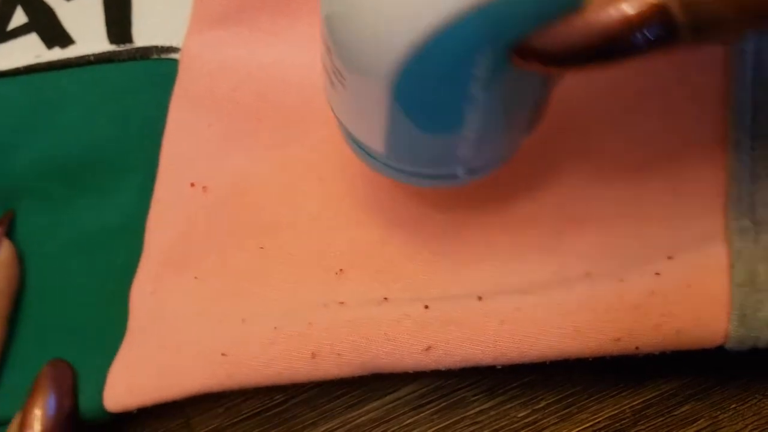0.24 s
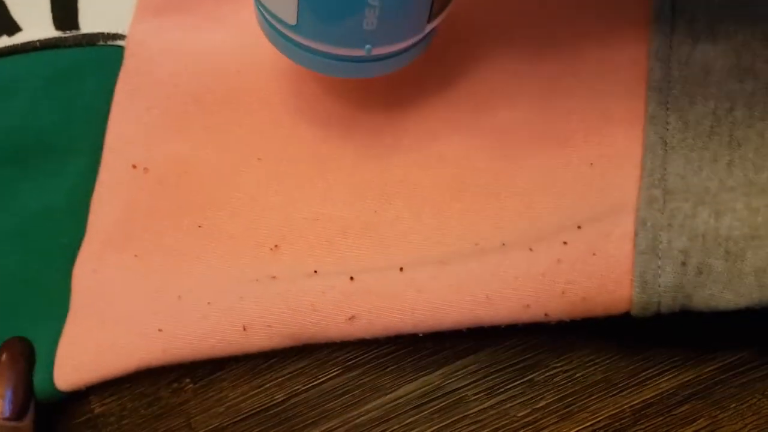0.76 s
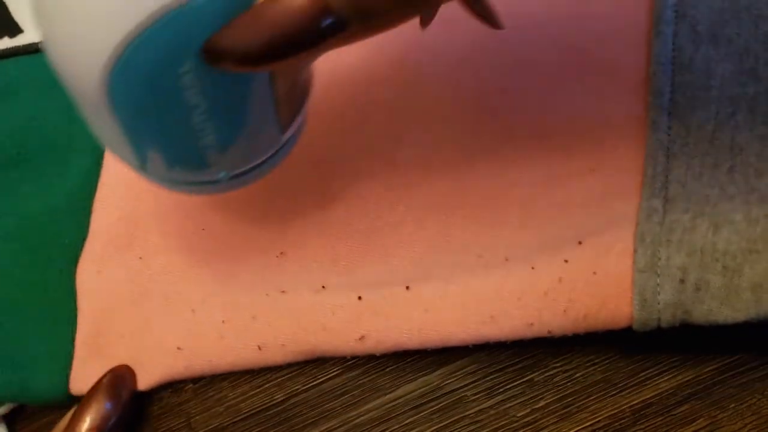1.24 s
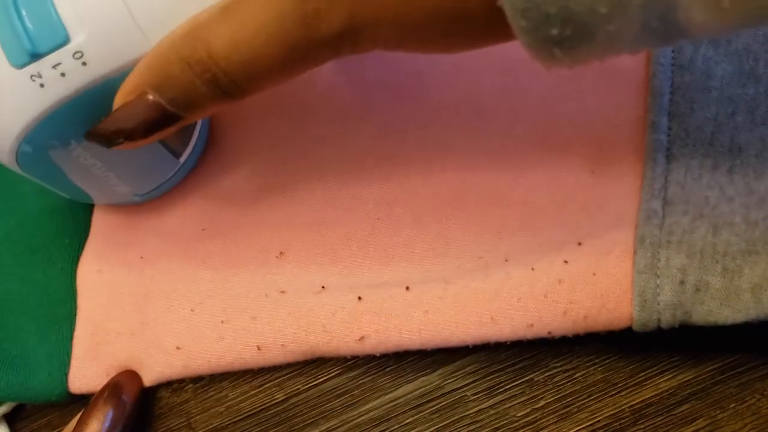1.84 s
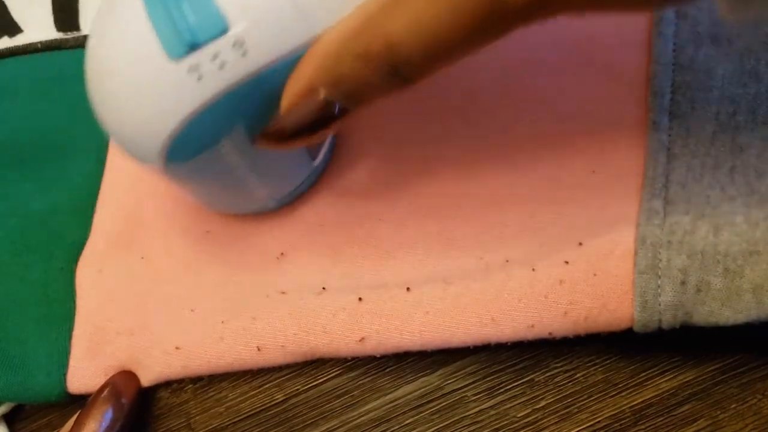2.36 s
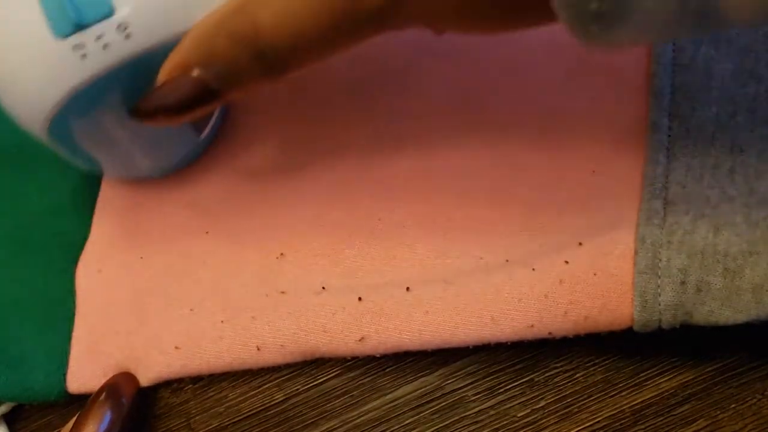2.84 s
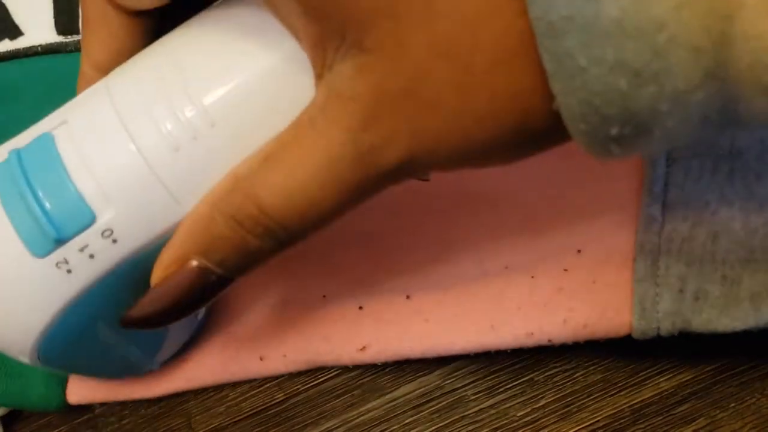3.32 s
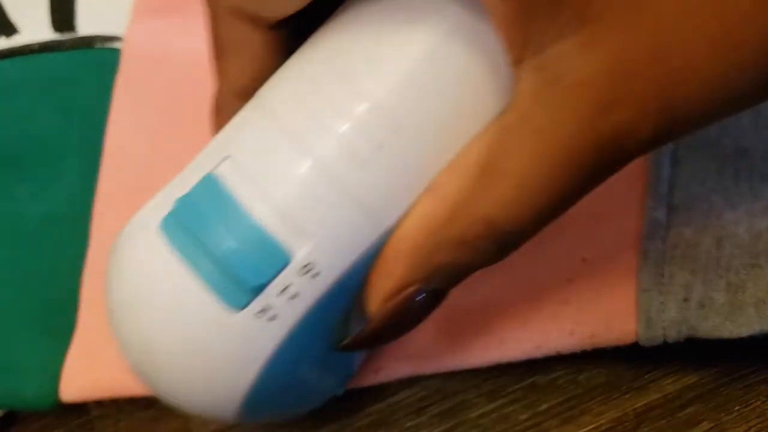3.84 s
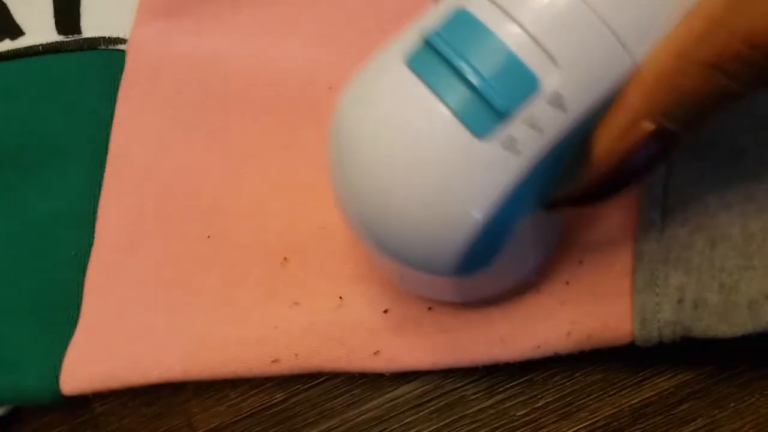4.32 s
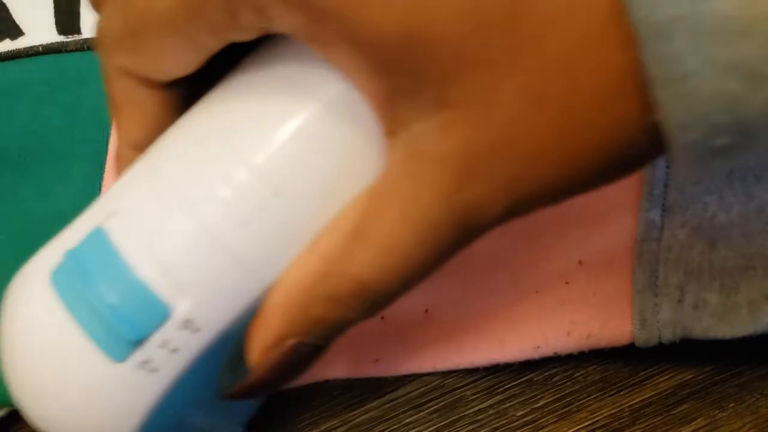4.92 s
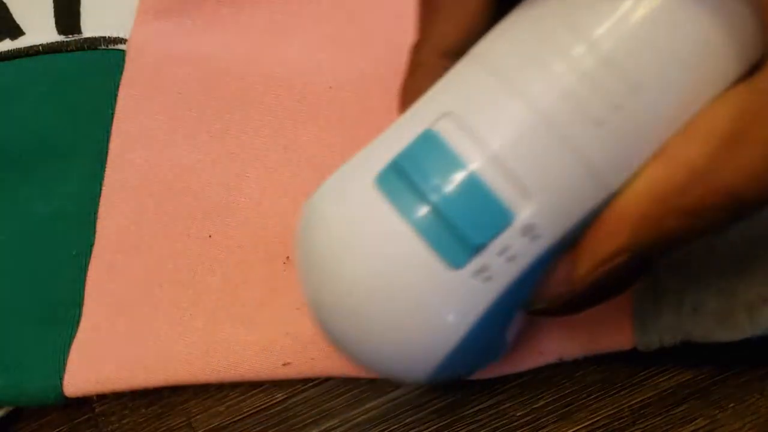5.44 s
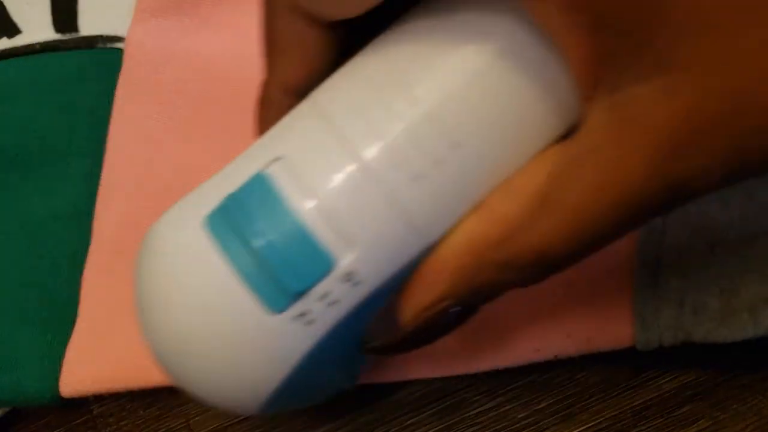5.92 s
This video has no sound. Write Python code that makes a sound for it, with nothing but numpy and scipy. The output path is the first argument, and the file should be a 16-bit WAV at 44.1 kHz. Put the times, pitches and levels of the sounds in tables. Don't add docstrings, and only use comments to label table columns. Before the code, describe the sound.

Close, buzzy whir of a small motorised lint shaver, its hiss and pitch wavering slightly as it bites fluff on fabric indoors.

```python
import sys
import numpy as np
from scipy import signal
from scipy.fft import rfft, irfft, next_fast_len
from scipy.io import wavfile
from scipy.ndimage import uniform_filter1d, map_coordinates

SR = 44100
rng = np.random.default_rng(int(sys.argv[2]) if len(sys.argv) > 2 else 0)


def put_to_file(sound):
    columns = np.atleast_2d(sound).T
    safe = np.clip(columns, -1, 1)
    whole_steps = np.round(safe * 32767)
    wavfile.write(sys.argv[1], SR, whole_steps.astype(np.int16))


def voltage_ratio(level):
    return 10 ** (np.asarray(level, float) / 20)


N = 272614


def unit(x):
    return x / np.sqrt(np.mean(x ** 2) + 1e-20)


def curves(rows):
    s, *cols = np.transpose(rows)
    return [np.interp(np.arange(N) / SR, s, c) for c in cols]


def smooth(coarse):
    return np.interp(np.arange(N) / 64, np.arange(len(coarse)), coarse)


def wobble(rate, count=1):
    at = np.arange(0, N + 64, 64) * rate / SR
    knots = rng.standard_normal((count, int(at[-1]) + 4))
    return np.array([smooth(map_coordinates(k, [at])) for k in knots])


def held(rows, rest_db):
    t = np.arange(0, N + 64, 64) / SR
    edge_s = 0.061
    level_db = rest_db
    for start, end, db in rows:
        inside = np.clip(np.minimum(t - start, end - t) / edge_s + 0.5, 0, 1)
        level_db = level_db + (db - rest_db) * inside
    return smooth(level_db)


def coloured(x, spectrum):
    f, db = np.transpose(spectrum)
    hz = np.fft.rfftfreq(2048, 1 / SR)
    cepstrum = irfft(np.log(voltage_ratio(np.interp(np.log(hz + 1), np.log(f), db)) + 1e-4))
    cepstrum = cepstrum * np.r_[1, np.full(1023, 2), 1, np.zeros(1023)]
    impulse = irfft(np.exp(rfft(cepstrum)))
    return unit(signal.fftconvolve(x, impulse[None], axes=1)[:, :N])


def pair(alike):
    a, b = rng.standard_normal((2, N))
    turn = np.arccos(np.clip(alike, -1, 1)) / 2
    return np.cos(turn) * a + np.sin(turn) * np.array([b, -b])


def impulses(at, size):
    taps = np.arange(-7, 9)
    d = taps - (at % 1)[:, None]
    kernel = np.sinc(d) * np.cos(np.pi * d / 16) ** 2
    index = np.clip(at.astype(int)[:, None] + taps, 0, N - 1).ravel()
    return np.array([np.bincount(index, (s[:, None] * kernel).ravel(), N) for s in size])


# t/s, level/dB
BEFORE = [(0.0, -60.5), (0.28, -61)]
# f/Hz, level/dB per Hz
RUSTLE = [(24, -41), (40, -24), (541, -10), (693, -16), (824, -20), (1000, -23), (1350, -22), (1460, -23),
          (3140, -38.5), (3740, -43), (4400, -43), (5200, -48), (9000, -52.5), (14000, -55), (15000, -73)]
# t/s, peak level/dB, relative tick level/dB
KNOCKS = [
    (0.153, -33, -7.5),
    (0.156, -50, -0.5),
    (0.166, -35, -24),
    (0.1962, -46.5, -4),
    (0.257, -42, -10),
    (0.267, -35.5, -30),
]
# f/Hz, level/dB, 60 dB decay time/s
KNOCK_MODES = [(207, 0.5, 0.063), (235, -6.5, 0.092), (418, -9.5, 0.053)]
# f/Hz, level/dB
TICK_MODES = [(1850, 7.5), (2100, 4), (2600, -3), (3500, -0.5), (4300, -12), (6200, -22), (8600, -22)]


def handling():
    out, t = np.zeros(N), np.arange(SR // 8) / SR
    for s, db, tick_db in KNOCKS:
        thud = sum(voltage_ratio(level - 60 * t / t60) * np.sin(2 * np.pi * hz * t) for hz, level, t60 in KNOCK_MODES)
        tick = sum(voltage_ratio(level + rng.normal(0, 2.4)) * np.sin(2 * np.pi * hz * t) for hz, level in TICK_MODES)
        scrape = uniform_filter1d(uniform_filter1d(rng.standard_normal(len(t)), size=5), size=4)
        tick = voltage_ratio(tick_db - 0.5 - 60 * t / 0.013) * (tick + scrape) * (1 - np.exp(-t / 0.001))
        out[round(s * SR):][:len(t)] += voltage_ratio(db - 1.0) * (thud * (1 - np.exp(-t / 0.0035)) + tick)
    rustle_db = curves(BEFORE)[0] + 2.5 + 1.4 * wobble(34.0)
    return out + voltage_ratio(rustle_db) * coloured(pair(1), RUSTLE)


# t/s, half length/s, level/dB
SHOVES = [(1.403, 0.081, -65), (1.71, 0.11, -63), (2.1, 0.23, -69), (3.033, 0.14, -69),
          (3.462, 0.16, -66.5), (3.678, 0.11, -59), (3.874, 0.092, -59.5), (4.063, 0.043, -65),
          (4.425, 0.28, -64), (4.823, 0.074, -69), (5.1, 0.27, -66), (5.36, 0.097, -55),
          (5.68, 0.23, -63.5), (6.023, 0.15, -64)]
# f/Hz, level/dB per Hz
BOARD = [(100, -25), (150, 2), (175, -9.5), (205, 0), (250, -10), (320, -8), (450, -32), (800, -40),
         (2000, -120)]
# f/Hz, level/dB per Hz
TABLE = [(15, -71), (25, -32), (59, 3.5), (91, 2.5), (130, -5), (170, -38), (290, -120)]
# f/Hz, level/dB per Hz
WASH = [(200, -17), (300, -5), (600, 0.5), (1000, -3), (1400, -4.5), (2000, -19), (3000, -59), (4000, -120)]
# f/Hz, level/dB
TABLE_HUM = [(59, -85), (75, -75), (116, -78.5), (151, -76.5)]
# t/s, level/dB
WHINE = [(.3, -62.5), (1.5, -62.5), (1.78, -55.5), (2.07, -61), (2.4, -58.5), (2.82, -57.5), (3.45, -59),
         (3.53, -54), (3.95, -58), (4.2, -55), (4.33, -56), (4.48, -53.5), (4.8, -55), (4.95, -53),
         (5.4, -55.5), (5.87, -53), (5.98, -55.5), (6.18, -51.5)]


def drag():
    t = np.arange(N) / SR
    idle_db, rumble_db, floor_db = -71.5, -71.5, -65.5
    push = voltage_ratio(idle_db) + sum(voltage_ratio(db) * np.exp(-((t - s) / w) ** 2) for s, w, db in SHOVES)
    relative_push = push / push.mean()
    board = unit(voltage_ratio(2.3 * wobble(22.02)) * coloured(pair(0.92), BOARD))
    rumble = voltage_ratio(rumble_db + 2.9 * wobble(9.8)) * relative_push ** 0.3 * coloured(pair(0.91), TABLE)
    wash = voltage_ratio(floor_db + 0.93 * (curves(WHINE)[0] + 59)) * coloured(pair(0.64), WASH)
    hum = sum(voltage_ratio(db + 2.4 * wobble(3.9)[0]) * np.sin(2 * np.pi * hz * t) for hz, db in TABLE_HUM)
    return relative_push ** 0.48 * hum + wash + push * board + rumble


# multiple of the shaft rate, level/dB
ORDER_DB = [(1, -13), (2, -15), (3, -10.5), (4, -31.5), (5, -13), (6, 0), (7, -20), (8, -15), (9, -13),
            (10, -25), (11, -9), (12, -14.5), (13, -18)]
# start t/s, end t/s, level/dB
FREE_RUNS = [(.3, 1.17, -56), (1.17, 1.33, -59.5), (2.36, 2.68, -57), (2.95, 3.12, -67), (3.36, 3.9, -58),
             (3.9, 4.14, -55.5), (4.14, 4.55, -47.5), (4.55, 4.93, -55.5), (4.93, 5.13, -65),
             (5.13, 5.5, -52.5), (5.5, 5.72, -49.5), (5.72, 6.3, -55)]
# start t/s, end t/s, level/dB
SEATED = [
    (1.6, 2.1, -67.5),
    (2.35, 2.45, -67),
    (2.65, 3.1, -68),
    (3.42, 4.0, -66),
    (4.72, 5.35, -60),
    (5.6, 5.8, -64.5),
    (5.92, 6.08, -61.5),
]
# start t/s, end t/s, level/dB
TWENTYFOURS = [
    (2.5, 2.72, -67),
    (3.12, 3.33, -62),
    (3.9, 4.32, -64),
    (4.55, 4.75, -56.5),
    (5.12, 5.9, -57),
]
# start t/s, end t/s, level/dB
THIRTIES = [
    (.3, .74, -60),
    (.74, 1.33, -57.5),
    (1.33, 2.0, -65),
    (2.74, 2.95, -57.5),
    (2.95, 3.12, -65),
    (3.92, 4.55, -56),
    (4.62, 4.9, -62),
    (5.12, 5.6, -51),
    (5.6, 6.3, -58),
]


def motor(turns):
    def tone(k, lag):
        phase = k * turns + rng.random()
        return np.sqrt(2) * np.sin(2 * np.pi * phase + np.array([[lag], [-lag]]))

    quiet_db, damped_db, loose_db = -76, -67.5, -75.5
    six_db = curves(WHINE)[0] + 1.17 * wobble(5.1)
    eighteen_db = held(FREE_RUNS, damped_db) + 1.0 * wobble(4.67)
    twentyfour_db = held(TWENTYFOURS, quiet_db) + 1.1 * wobble(7.6)
    thirty_db = held(THIRTIES, quiet_db) + 0.97 * wobble(6)
    three_db = held(SEATED, loose_db) + 2.5 * wobble(6)
    hum = sum(voltage_ratio(db + 1.9 * wobble(3.61)) * tone(k, rng.normal(0, 0.56))
              for k, db in ORDER_DB if k not in (1, 2, 3, 6))
    high = voltage_ratio(eighteen_db) * tone(18, 0.64) + voltage_ratio(thirty_db) * tone(30, 0.8)
    high = high + voltage_ratio(twentyfour_db) * tone(24, 0.92)
    return voltage_ratio(six_db) * (tone(6, 0.21) + voltage_ratio(-0.8) * hum) + high + voltage_ratio(three_db) * tone(3, 0.71)


def ticks(turns, contact, slip_s, scatter, drift, drift_rate, apart, sixfold, count):
    def even(x):
        return 1.37 * np.tanh(x / 1.37)

    poles = 6
    angle = (np.arange(count) + np.tile(rng.random(count // poles), poles)) / count
    at = np.interp(np.arange(int(turns[-1]))[:, None] + angle, turns, np.arange(N))
    knots = rng.standard_normal((count, 64))
    slow = map_coordinates(knots, [np.arange(count) + 0 * at, at * drift_rate / SR], order=1)
    repeated = np.tile(rng.standard_normal(count // poles), poles)
    own = even(rng.standard_normal(count) + sixfold * repeated)
    view = apart * even(rng.standard_normal((2, 1, count)))
    chance = rng.standard_normal((4,) + at.shape)
    press = contact[at.astype(int)]
    random_size = (0.046 + scatter * press) * (chance[0] + apart * chance[1:3])
    size = own + view + drift * slow + random_size
    return impulses((at + SR * slip_s * press * chance[3]).ravel(), size.reshape(2, -1))


# t/s, level over the whir/dB
SNAGS = [(1.937, 1), (1.983, 1), (2.053, 8), (2.159, 0), (2.316, 4.5), (2.345, 2), (2.445, 1), (2.799, 3),
         (3.153, 6), (3.398, -3), (3.414, 6), (3.44, 2), (3.554, 1), (3.68, 3.5), (3.71, 5), (3.83, 4),
         (3.865, 3), (3.946, 4.5), (3.982, 2.5), (4.059, -2), (4.278, 6), (4.783, 2.5), (4.872, 4),
         (5.105, 7.5), (5.156, 2), (5.204, 5), (5.86, 0), (6.043, 3.5), (6.113, 2.5)]


def snags(contact):
    decay_s, rise_s = 0.0037, 0.00041
    pills_per_s, pill_db = 60, -12
    bites, t = np.zeros(N), np.arange(SR // 20) / SR
    chance = rng.random((600, 3))
    at = (chance[:, 0] * N).astype(int)
    caught = chance[:, 1] < contact[at] * pills_per_s * N / SR / len(at)
    bites[at] = caught * voltage_ratio(pill_db) * 2 * chance[:, 2]
    for s, db in SNAGS:
        bites[round(s * SR)] = voltage_ratio(db) - 1
    shape = np.exp(-t / decay_s) * (1 - np.exp(-t / rise_s))
    return 1 + signal.fftconvolve(bites, shape / shape.max())[:N]


# delay t/s, level/dB
ECHOES = [(.00022, -12.5), (.0006, -11)]
# t/s, f/Hz, boost level/dB
SHEEN = [(0.3, 12300, 6), (0.63, 13000, 6), (0.76, 12200, 2), (1.12, 12100, 3), (1.23, 13300, 1),
         (1.3, 11400, 1), (1.43, 12400, 4.5), (2.02, 11800, 4), (2.1, 12600, 8), (3.3, 12200, 3.5),
         (3.36, 11300, 6), (4.0, 11100, 4.5), (4.05, 12200, 0), (4.31, 11500, -1), (4.43, 12900, -2),
         (4.49, 11600, 4), (6.03, 11200, 1), (6.18, 12100, 1)]
# start t/s, end t/s, level/dB, f/Hz, half width f/Hz
HOLLOWS = [(.42, .52, -30, 4350, 300), (.62, .74, -25, 4150, 350), (.92, 1.04, -40, 4500, 250),
           (1.1, 1.26, -40, 4450, 300), (1.3, 1.39, -40, 3900, 350), (2.09, 2.21, -60, 3600, 350),
           (2.24, 2.32, -60, 3950, 300), (2.38, 2.43, -70, 3650, 500), (2.81, 2.88, -35, 2350, 250),
           (3.16, 3.34, -30, 3550, 180), (3.49, 3.73, -80, 3900, 530), (1.12, 1.26, -40, 2700, 130),
           (1.5, 1.68, -30, 4000, 150), (1.56, 1.66, -35, 3250, 120), (.5, .7, -30, 3950, 120),
           (4.845, 4.87, -40, 4000, 250), (4.845, 4.87, -40, 2750, 130), (4.93, 4.96, -40, 4050, 200),
           (5.005, 5.03, -40, 4500, 200), (5.145, 5.17, -40, 3100, 200), (4.98, 5.01, -40, 7250, 250),
           (5.24, 5.32, -25, 4500, 150), (2.08, 2.33, -30, 2250, 110), (4.5, 4.7, -20, 1500, 120),
           (1.45, 1.52, -30, 8600, 350), (5.6, 5.65, -35, 11700, 300), (3.7, 3.74, -40, 14400, 350),
           (3.68, 3.71, -60, 4600, 350), (3.79, 3.87, -30, 3800, 250), (4.475, 4.52, -50, 2950, 230),
           (4.6, 4.65, -50, 3500, 300), (4.97, 5.05, -35, 3650, 220), (5.07, 5.12, -40, 3950, 200),
           (5.15, 5.19, -40, 4550, 200), (6.0, 6.04, -50, 3100, 300), (.49, .57, -45, 9300, 280),
           (4.66, 4.71, -45, 10100, 280), (5.03, 5.12, -50, 14700, 400)]
BAND_HZ = [800, 2850, 3700, 4900, 7300, 15800]


def moving(x, levels_db, unrest, sway, patchy_db, twist):
    hz, t, z = signal.stft(x, SR, nperseg=512)
    frame = np.minimum((t * SR).astype(int), N - 1)
    for delay, db in ECHOES:
        path = delay * np.exp(sway * wobble(1.6, count=2)[:, None, frame])
        z = z * (1 + voltage_ratio(db) * np.exp(-2j * np.pi * hz[:, None] * path))
    left_leads_s = 0.0001594
    z = z * np.exp(1j * np.pi * hz[:, None] * left_leads_s * np.array([1, -1])[:, None, None])
    field = uniform_filter1d(rng.standard_normal((2,) + z.shape), size=3, axis=2)
    field = uniform_filter1d(field, size=24, axis=3)
    z = z * voltage_ratio(patchy_db * unrest[frame] * unit(field[0]))
    z = z * np.exp(1j * twist * unrest[frame] * unit(field[1]))
    centre_hz, boost_db = np.array(curves(SHEEN))[:, frame]
    z = z * voltage_ratio(boost_db * np.exp(-((hz[:, None] - centre_hz) / 600) ** 2))
    gain = np.zeros(z.shape[1:])
    for lo, hi, db in zip(BAND_HZ, BAND_HZ[1:], levels_db):
        band = (hz >= lo) & (hz < hi)
        power = uniform_filter1d(np.sum(np.abs(z.mean(0)[band]) ** 2, 0), 21)
        gain[band] = voltage_ratio(db[frame]) / np.sqrt(np.abs(power) + 1e-12)
    shut_db, shut_s = 0, 0.022
    for start, end, db, centre, width in HOLLOWS:
        inside = np.clip(np.minimum(t - start, end - t) / shut_s + 0.5, 0, 1)
        shut_db = shut_db + np.exp(-((hz[:, None] - centre) / width) ** 4) * db * inside
    z = z * uniform_filter1d(gain, size=5, axis=0) * voltage_ratio(shut_db)
    return signal.istft(z, SR, nperseg=512)[1][:, :N]


# f/Hz, level/dB per Hz
FOIL = [(2470, -40), (3500, -19), (4200, -15.5), (4880, -14), (5250, -9), (5510, 1), (5920, -2),
        (6880, 0.5), (7430, -3.5), (7900, -0.5), (9030, -5.5), (9540, -3), (10900, 1.5), (11700, -3),
        (12500, 0), (15100, -1), (15800, -1.5)]
# f/Hz, level/dB per Hz
HOUSING = [(470, -40), (800, -12), (1100, -13.5), (1240, -13), (1590, -10), (2030, 0.5), (2200, -1.5),
           (2470, 3.5), (3210, -5), (3480, -13), (4600, -21.5), (5980, -49), (10100, -120)]
# multiple of the shaft rate, level/dB
RING_ORDERS = [(47, -11), (48, -11.5), (49, -12.5), (54, -13), (58, -13), (60, -16), (82, -14.5), (85, -14),
               (95, -15), (97, -13.5), (107, -11.5), (133, -7.5)]
# t/s, nearness as blade sizzle level/dB, housing turned to the microphones level/dB, left-right level/dB
HAND = [(0.31, -46.5, -9.5, -2), (0.95, -44.5, -10.5, 0), (1.54, -45, -14.5, 1), (1.62, -42.5, -14, 2.5),
        (1.83, -43.5, -10.5, 2.5), (2.24, -43, -12, 0.5), (2.35, -39.5, -18.5, -0.5),
        (2.39, -41.5, -12.5, 0.5), (2.66, -42.5, -12.5, 1.5), (3.45, -41.5, -12, 0), (3.84, -43, -9, 1.5),
        (4.13, -40.5, -6, -1.5), (4.43, -37, -12, 0.5), (5.02, -40.5, -10, 1), (5.13, -41.5, -5, -0.5),
        (5.56, -40, -6.5, -3.5), (6.06, -36, -10, 1.5), (6.18, -38.5, -6.5, 1.5)]
# start t/s, end t/s, level/dB
TILTED = [
    (1.06, 1.2, -4.5),
    (2.28, 2.4, 1),
    (3.45, 3.75, -2.5),
    (4.05, 4.25, -2),
    (4.43, 4.51, -5.5),
    (4.6, 4.67, -1),
    (4.88, 5.0, -2.5),
    (5.7, 5.8, 3),
    (5.86, 5.96, -3),
]
# start t/s, end t/s, level/dB
COVERED = [
    (.4, .92, -2),
    (.92, 1.5, -3.5),
    (1.9, 2.08, -1),
    (2.6, 2.72, 0),
    (3.15, 3.45, -1.5),
    (4.48, 4.66, -5.5),
    (4.84, 5.25, -0.5),
    (5.35, 5.5, -1.5),
]
# start t/s, end t/s, level/dB
CUPPED = [(.3, 1.5, -2), (1.5, 2.05, 0.5), (2.1, 2.2, 1), (2.2, 2.45, -4), (2.76, 2.9, -3),
          (3.15, 3.5, -1.5), (3.5, 3.75, -3), (4.47, 4.56, -4), (4.56, 4.64, -4), (4.95, 5.12, -2),
          (5.85, 6.1, -3)]


def cutter(turns, contact):
    db, housing_db, pan_db = curves(HAND)
    db = db + 0.68 * wobble(11)[0]
    ring_db = -1 - 12.5 * contact + held(TILTED, 0) + 0.86 * wobble(6)[0]
    shadow_db = -8.5 + 0.72 * housing_db + held(COVERED, 0) + 0.63 * wobble(9.1)[0]
    shoulder_db = -13.5 + 0.33 * housing_db - 0.5 * contact + held(CUPPED, 0)
    fibres = contact * voltage_ratio(2.3 * wobble(12) + 0.91 * np.cos(2 * np.pi * turns))

    edge = unit(ticks(turns, contact, slip_s=1.1e-5, scatter=0.79, drift=0.78, drift_rate=1.5,
                      apart=2.6, sixfold=0.32, count=72))
    foil = coloured(edge + voltage_ratio(1.0) * fibres * pair(0.059), FOIL)
    body = unit(ticks(turns, contact, slip_s=1.4e-5, scatter=0.98, drift=1.37, drift_rate=1.607,
                      apart=1.0, sixfold=1.2, count=24))
    housing = coloured(body + voltage_ratio(-4.0) * (0.45 + fibres) * pair(0.19), HOUSING)
    phases = 2 * np.pi * rng.random((len(RING_ORDERS), 2, 1))
    ring = sum(voltage_ratio(d + 2.4 * wobble(2.31)) * np.sin(2 * np.pi * k * turns + p)
               for (k, d), p in zip(RING_ORDERS, phases))

    levels_db = [db + housing_db - 4.0 + 2.6 * contact, db + shoulder_db, db + shadow_db - 1.5,
                 db + ring_db - 0.76, db - 0.56]
    unrest = 0.38 + 0.62 * np.minimum(2 * contact, 1)
    whir = foil + ring * (1 - 0.63 * contact) + voltage_ratio(np.array([[-7.5], [-9.5]])) * housing
    whir = moving(whir, levels_db, unrest, sway=0.13, patchy_db=3.5, twist=0.63)
    return snags(contact) * voltage_ratio(np.array([pan_db, -pan_db]) / 2) * whir


# t/s, shaft rate f/Hz
SHAFT = [(0.3, 114.3), (0.79, 114.8), (1.21, 114.1), (1.64, 115.0), (1.97, 113.2), (2.4, 115.8),
         (2.82, 115.1), (2.87, 115.7), (3.16, 115.3), (3.21, 116.0), (4.2, 115.9), (4.38, 116.8),
         (4.59, 115.2), (4.83, 115.1), (5.0, 115.9), (5.59, 116.4), (6.13, 113.9), (6.18, 114.6)]
# t/s, pressure 0-1
CONTACT = [(.3, 0.07), (1.7, 0.07), (1.76, 0.44), (2.36, 0.6), (2.42, 0.16), (2.7, 0.12), (2.76, 0.48),
           (3.3, 0.34), (4.24, 0.63), (4.3, 0.22), (4.72, 0.07), (4.86, 0.51), (5.5, 0.36), (5.7, 0.62),
           (6.18, 0.39)]
# t/s, level/dB, settling time/s
SURGES = [
    (1.572, 2.5, 0.027),
    (4.055, 2, .05),
]
# t/s, half width/s, depth level/dB
DIPS = [
    (0.289, 0.014, -52),
    (4.049, 0.015, -11.5),
]


def scene():
    t = np.arange(N) / SR
    turns = np.cumsum(curves(SHAFT)[0] * (1 + 0.000403 * wobble(14)[0])) / SR
    head = cutter(turns, np.clip(curves(CONTACT)[0], 0, 1))
    bass_pan_db = -2
    shaver = head + motor(turns) + drag() * voltage_ratio(np.array([[bass_pan_db], [-bass_pan_db]]) / 2)
    surge = voltage_ratio(sum(db * (t > s) * np.exp(-np.abs(t - s) / settle) for s, db, settle in SURGES))
    fades = np.prod([1 - (1 - voltage_ratio(db)) * np.clip(1 - np.abs(t - s) / w, 0, 1) for s, w, db in DIPS], 0)
    return fades * surge * np.where(t < DIPS[0][0], handling(), shaver)


def band_limit(x):
    return signal.sosfilt(signal.butter(12, 17100, fs=SR, output="sos"), x)


def record(dry):
    size = next_fast_len(N)
    edge = np.clip((BAND_HZ[-1] + 150 - np.fft.rfftfreq(size, 1 / SR)) / 150, 0, 1)
    mix = irfft(rfft(dry, size) * np.sin(np.pi / 2 * edge) ** 2, size)[:, :N]
    return band_limit(mix)


dry = scene()
out = record(dry)
put_to_file(out)
```